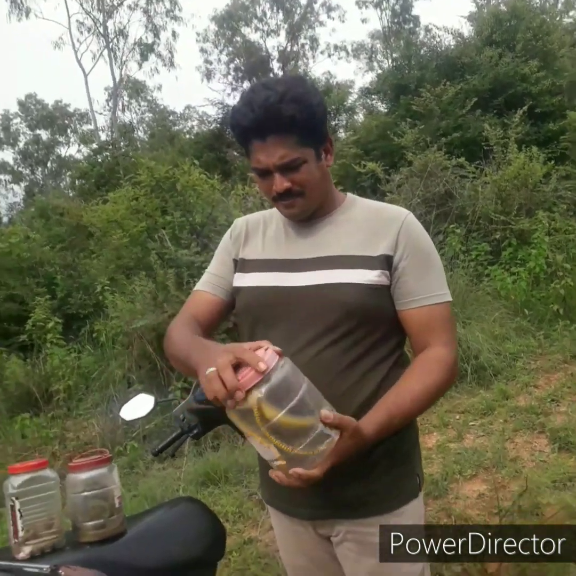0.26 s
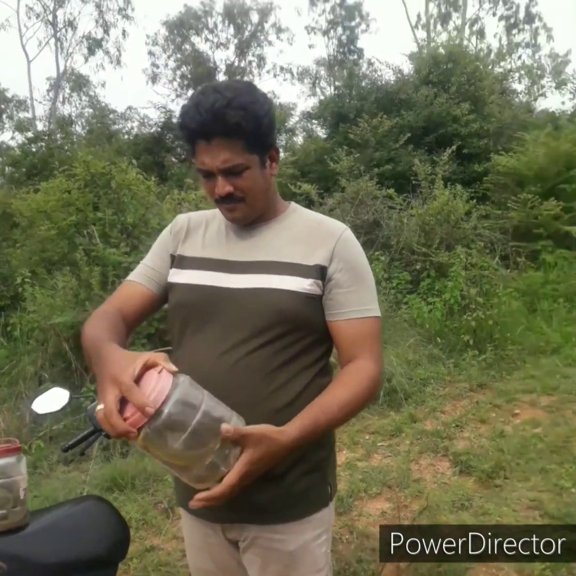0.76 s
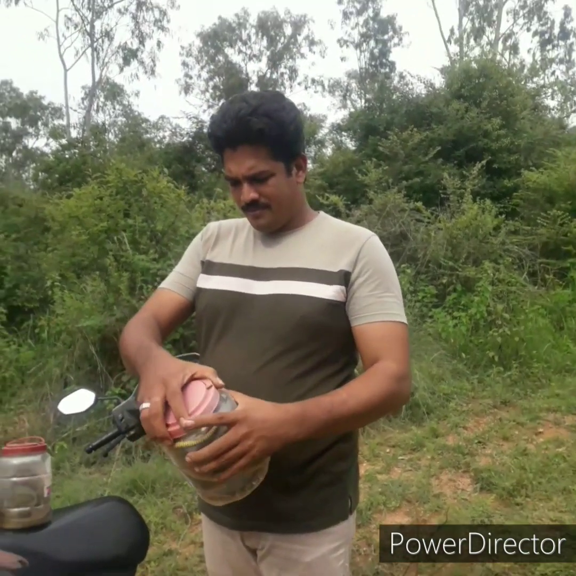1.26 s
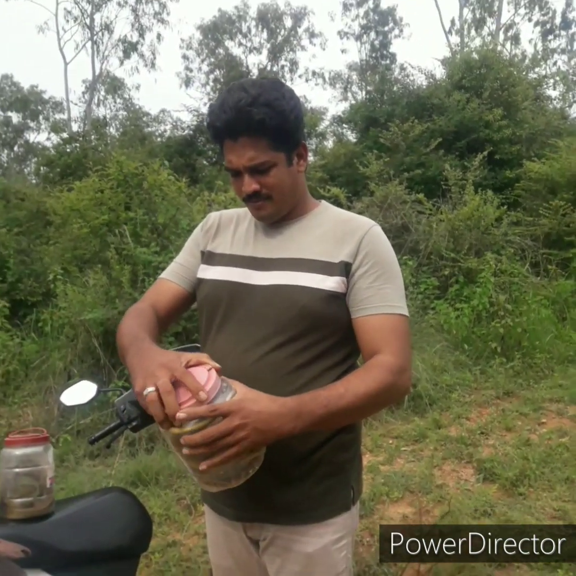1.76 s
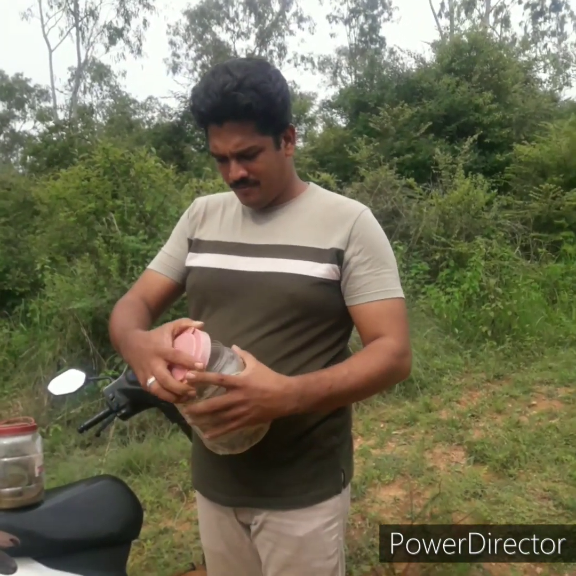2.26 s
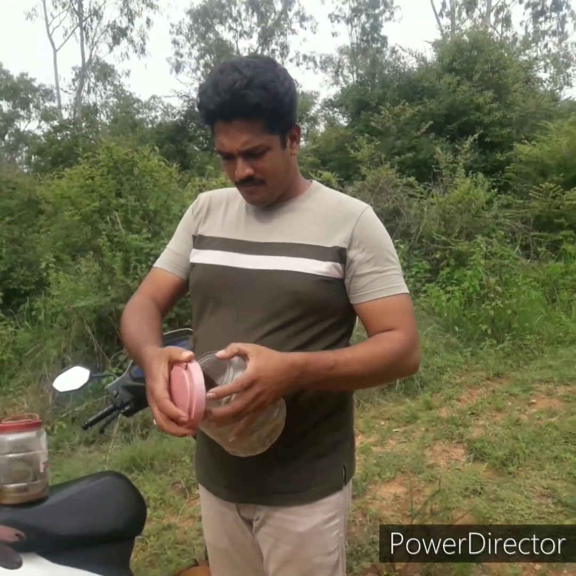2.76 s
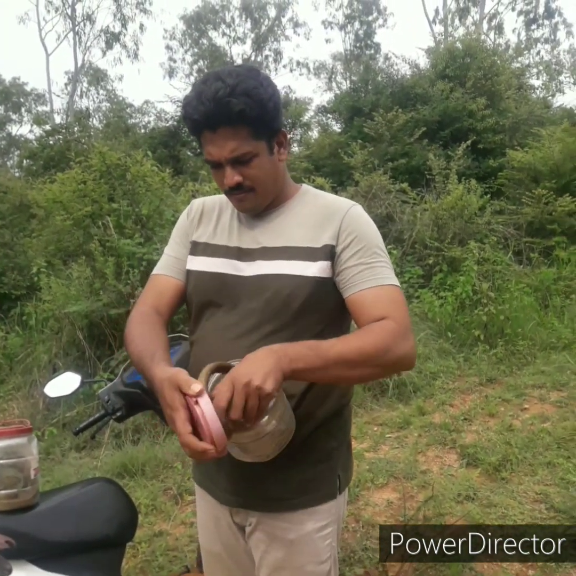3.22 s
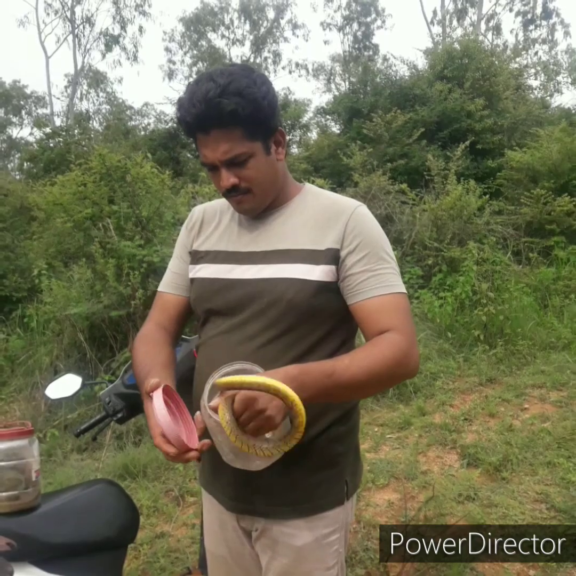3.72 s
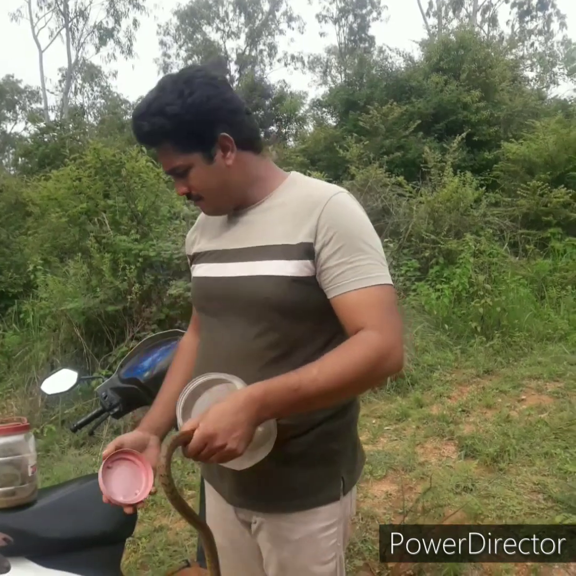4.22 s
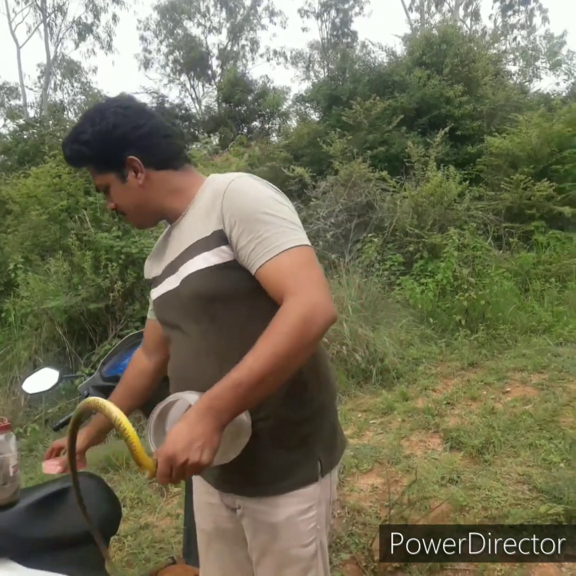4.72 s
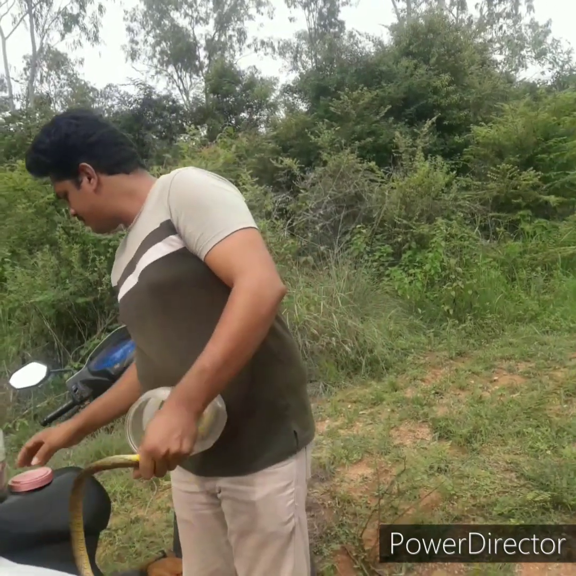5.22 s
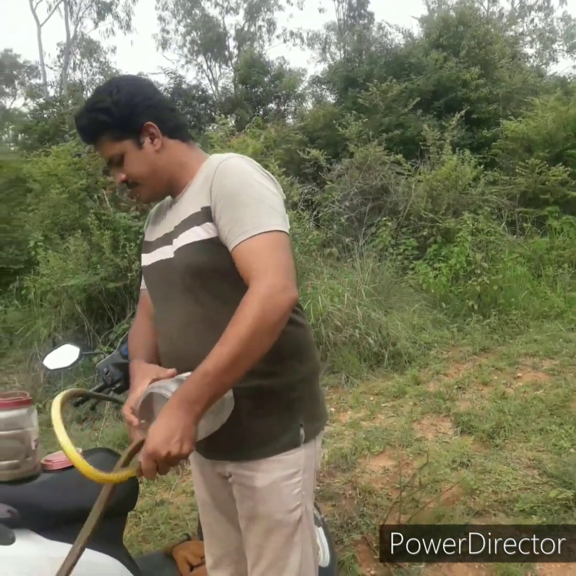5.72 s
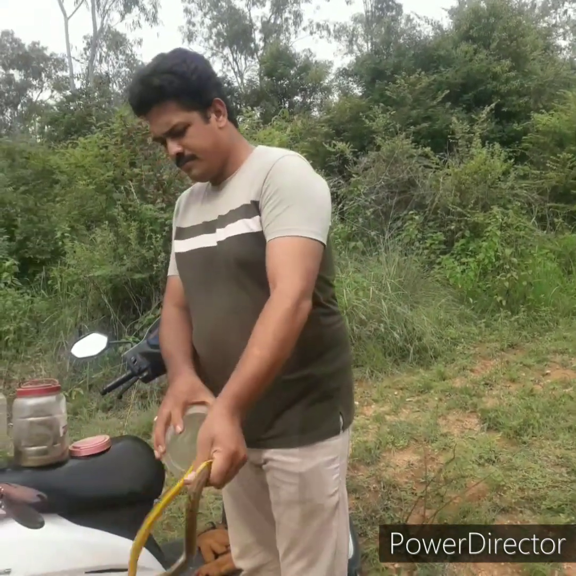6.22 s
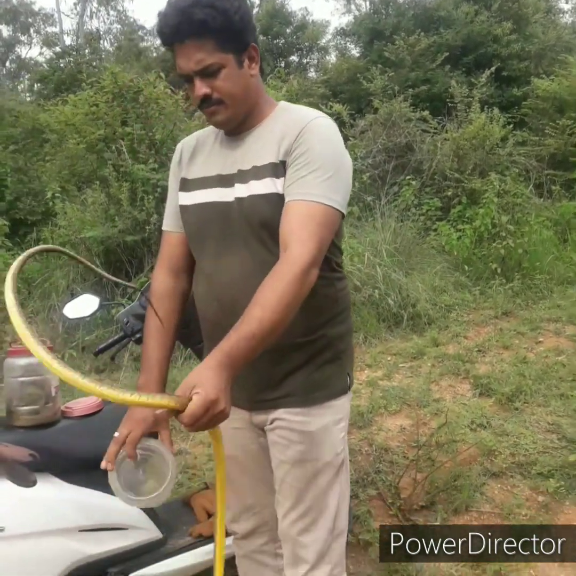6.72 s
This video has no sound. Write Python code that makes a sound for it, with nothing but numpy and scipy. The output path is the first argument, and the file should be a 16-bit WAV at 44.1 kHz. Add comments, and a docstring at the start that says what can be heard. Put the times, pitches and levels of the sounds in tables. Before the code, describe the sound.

A large thin plastic jar snaps and clicks as its screw lid is worked off, then gives hollow knocks over soft outdoor air and leaf rustle.

```python
"""A plastic jar handled outdoors

A big thin-walled jar is handled and its screw lid worked off: walls snap, thread ticks and rubs, and
the open jar knocks hollowly. Contacts are impulses exciting damped modes; rubs and hand moves are
trains of random small impulses. Behind them, filtered noise gives a soft rush of air and leaves, a
rustle and a fine high hiss, and noise-modulated sines give a few thin, blurred, gliding whistles."""
import sys
import numpy as np
from scipy import signal
from scipy.fft import rfft, irfft, next_fast_len
from scipy.io import wavfile

SR = 44100
rng = np.random.default_rng(int(sys.argv[2]) if len(sys.argv) > 2 else 0)


def persist_wave(psi):
    """Save psi, clipped to +-1, as 16-bit WAV."""
    counts = np.round(np.clip(psi, -1, 1) * 32767).astype(np.int16)
    wavfile.write(sys.argv[1], SR, np.atleast_2d(counts).T)


N = 307590   # samples

# snaps and knocks of jar and lid; level_db is that of the clack register, before peak rounding:
# start_s, level_db, boom_db and sizzle_db (both against the clack), ring_factor, crack_sharpness, panel_hz
JAR_CONTACTS = [ (.272, -25.5, -16, -2, 0.54, 1.05, 1170), (0.3363, -17.5, -11, -20.5, 0.89, .5, 488),
                (.388, -19, -21, -13, 0.47, 1.16, 1230), (1.367, -39.5, -4, -39, 0.54, .3, 670),
                (1.401, -20.5, -11, -13.5, 0.71, 0.31, 655), (1.4224, -26.5, -15, -20, .68, .26, 660),
                (1.673, -42, -2, -35, .64, .3, 681), (1.743, -21, -14.5, -31, 0.78, 0.63, 624),
                (1.7631, -41.5, 0, -36, 0.49, .4, 622), (1.933, -45.5, 8, -5, 0.87, .15, 231),
                (1.9582, -24.5, -19, -7, .29, 1.7, 1420), (1.9633, -24, -28.5, -6, 1.8, 1.8, 1170),
                (2.154, -52.5, 2, -11, 2.85, .3, 196), (2.167, -48.5, -1.5, -13, 2.6, .1, 990),
                (2.272, -56.5, -2, -37, .7, 0.61, 1741), (2.424, -49, -2, -25, 0.72, 0.33, 1241),
                (2.4339, -27, -18.5, -29.5, 0.59, 0.41, 638), (2.918, -42, -15, -35, 0.62, 0.38, 1280),
                (3.262, -53.5, 3, -3, 3.5, .18, 624), (3.293, -50, -11, -7, 1.3, 0.19, 182),
                (3.448, -46.5, -3.5, -6, 1.2, .1, 322), (3.935, -30.5, -24, -9, 0.71, .11, 676),
                (3.963, -29, -23, -24, 1.5, 0.35, 3020), (3.9734, -30.5, -12, -16, 1.24, .35, 2570),
                (3.9948, -14.5, -18, -19, 0.75, 0.12, 682), (4.009, -48, 23, -12.5, 0.9, .1, 383),
                (4.025, -35.5, -3, -21, 0.61, .34, 182), (4.238, -46.5, 5, -10, 1.2, .2, 534),
                (4.804, -50, -18, -12, .97, 0.31, 412), (4.995, -48.5, -11, -7, 0.8, .2, 307),
                (5.079, -52.5, 0, -10, .94, .3, 610), (5.15, -46.5, 5, -8, 0.85, 0.19, 289),
                (5.161, -38, -8.5, -8, 0.89, 0.32, 890), (5.223, -40.5, -12, -34, 0.98, 0.39, 661),
                (5.406, -55, 21, 3, 2.16, .2, 318), (5.688, -44, 7.5, -2, 6.6, .21, 282),
                (5.729, -52.5, 15.5, -3, 2.2, .22, 272), (5.77, -44.5, -11, 6.5, .9, 0.16, 303),
                (5.97, -47, 14.5, -14, 0.97, 0.26, 508), (6.034, -12.5, -7.5, -30.5, 1.3, 0.3, 304),
                (6.091, -57, 11, -12, 1.02, 0.18, 630), (6.577, -66, 33, 8, 1.9, .15, 273),
                (6.588, -58, 19.5, 7.5, 4.1, .2, 296), (6.9218, -13.5, -9, -18.5, 2.75, 0.41, 315)]
# the jar's registers boom, knock, clack, snap and sizzle: low_hz, high_hz
JAR_REGISTERS = [(115, 450), (450, 2200), (2200, 4500), (4500, 7300), (8000, 15500)]
# the jar's clear modes; mean strength, and decay at ring factor 1: mode_hz, strength_db, t60_s
CLEAR_MODES = [(159, -9, 0.067), (186, -3, 0.11), (254.5, -3.5, 0.084), (313.2, 1.5, 0.11),
               (392, -1.5, 0.071), (520, -1.5, 0.062), (605.13, -1, 0.082), (671.3, 2.5, 0.07505),
               (845, -4.5, 0.06841), (967.12, -0.5, 0.043), (1275, 0, 0.05281), (1530, -3.5, 0.045),
               (1950, -0.5, 0.051), (2142, -5, 0.042), (2472, 1, 0.034), (2745, 2.5, 0.048), (3305, 5, .03),
               (3600, 4, .035), (4310, 0, 0.042), (5180, 0, .04), (5910, 4, 0.051), (6430, 7.5, 0.038)]
# decay of the dense wall modes at ring factor 1: frequency_hz, t60_s
WALL_DECAY = [(200, 0.0001), (600, 0.1), (1500, 0.0471), (3500, 0.0072), (6000, 0.0434), (12000, 0.04)]
# spectrum of the dense wall modes: frequency_hz, relative_density_db (per Hz)
WALL_SPECTRUM = [(130, -11.5), (230, 1.5), (380, -0.5), (650, 0.5), (1000, -1), (1700, 1.5), (2500, 0),
                 (3300, 8), (4500, -2.5), (6200, 4), (7500, -13), (8700, -20), (11000, -4), (15000, -11.5)]
# hands and thread rubbing on the plastic: start_s, length_s, level_db, centre_hz
RUB_STROKES = [(1.151, 0.085, -51.5, 4600), (1.575, 0.053, -55.5, 2600), (1.972, 0.11, -52, 5030),
               (2.156, 0.045, -52, 3520), (2.63, 0.18, -61.5, 3500), (2.846, 0.15266, -56.5, 3020),
               (3.076, 0.072, -53.5, 4000), (3.206, 0.052, -57, 4020), (3.674, 0.05777, -54.5, 3920),
               (3.827, 0.092, -52, 5000), (5.106, 0.084, -57, 2500), (5.676, 0.069, -44.5, 4000),
               (5.778, 0.11, -47.5, 3050)]
# moves of the hand inside the jar, before the common trim: start_s, length_s, peak_level_db
HAND_MOVES = [(3.07, .4, -48), (3.58, 0.42, -47), (5.02, 0.26, -47), (5.62, 0.36, -44.5), (5.92, 0.22, -47)]
# thin whistles, before the common trim; bend above 1 glides early and settles, below 1 glides late:
# start_s, length_s, start_hz, end_hz, bend, level_db
THIN_WHISTLES = [ (0.399, 0.062, 4080, 3950, 1.2, -47), (0.509, 0.33, 3480, 3160, 1.4, -53.5),
                 (.93, .19, 6770, 5660, 3.4, -48), (1.161, 0.094, 3500, 3150, 1.5, -56),
                 (1.227, .1, 3500, 2500, 0.36, -51), (2.283, 0.056, 2200, 3200, .55, -68),
                 (3.67, 0.053, 3890, 3860, 1.1, -50.5), (4.397, 0.088, 6000, 6020, 1.3, -55),
                 (4.551, 0.148, 4700, 4540, 1.07, -62), (4.703, 0.18, 3540, 3390, 0.94, -61),
                 (5.167, 0.115, 3170, 2970, .9, -57), (5.347, 0.16, 7020, 6020, 1.5, -50),
                 (5.535, 0.11, 4220, 4020, 1.1, -50.5), (5.79, .18, 3540, 2640, 1.5, -52.5),
                 (6.168, 0.23, 2370, 2460, 2.5, -66)]
# level curve of the soft rustle, before RUSTLE_DB: time_s, level_db
RUSTLE_LEVEL = [(0.0, -57.5), (0.21, -56), (0.81, -60.5), (0.96, -63.5), (1.11, -68.5), (1.84, -59.5),
                (2.25, -71.5), (2.48, -74), (3.9, -62.5), (4.48, -74.5), (4.69, -69), (5.17, -65.5),
                (5.71, -67.5), (5.88, -61.5), (6.03, -59.5), (6.38, -69), (6.61, -86), (6.9, -57.5)]
# spectrum of the soft rustle: frequency_hz, relative_density_db (per Hz)
RUSTLE_SPECTRUM = [(100, -16.5), (500, 3), (900, -0.5), (1800, -2), (2700, -1.5), (3300, 1.5), (4700, 1),
                   (6100, 3), (7000, -2), (7800, -14), (15500, -12)]
# common level curve of air and hiss, before each layer's offset: time_s, level_db
BACKGROUND_LEVEL = [(0.0, -61), (0.33, -58), (0.55, -62), (1.15, -62.5), (1.9, -58), (2.17, -64.5),
                    (2.48, -69.5), (2.77, -69), (3.17, -64.5), (3.46, -57.5), (3.9, -55), (4.82, -58.5),
                    (5.78, -53.5), (6.67, -56.5), (6.9, -56)]
# spectrum of the moving air: frequency_hz, relative_density_db (per Hz)
AIR_SPECTRUM = [(25, -7), (100, -4), (205, 1), (350, -7.5), (500, -9), (660, -7.5), (1100, -14),
                (1800, -20), (2700, -15.5), (3300, -15.5), (4700, -18), (6100, -9.5), (7000, -13.5),
                (7600, -29.5)]
# spectrum of the high hiss: frequency_hz, relative_density_db (per Hz)
HISS_SPECTRUM = [(7500, -6.5), (9000, -8.5), (10000, -0.5), (10900, 2), (11700, -3.5), (12600, -13),
                 (14000, -12), (15500, -13.5)]
# passbands of low air, high air and hiss: low_hz, high_hz
BACKGROUND_BANDS = [(34, 1100), (2800, 7500), (7700, 16000)]

KNOCK_DB, KNOCK_FOLLOWS_BOOM = 1.5, 0.37   # the knock register rises with the boom
SNAP_DB, SNAP_FOLLOWS_SIZZLE = 5, 0.45   # the snap register rises with the sizzle
GROUND_ECHO_S, GROUND_ECHO_DB = .005, -9
LOW_AIR_DB, HIGH_AIR_DB, HISS_DB = 2.5, -4.5, 0.5   # against the background curve
RUSTLE_DB = 7   # against the rustle curve
CUTOFF_HZ = 15900


def contacts(modes_db=-5, panel_db=-11, crack_db=0, give_s=0.0024, give_fall=9.6):
    """Buckling: an impulsive crack excites the shell's modes, and the ground reflects the sound."""
    out, t = np.zeros(N), np.arange(5120) / SR
    filters = [signal.butter(4 if low > 1000 else 3, [low, high], "band", fs=SR, output="sos")
               for low, high in JAR_REGISTERS]
    for start, level_db, boom_db, sizzle_db, ring, sharpness, panel_hz in JAR_CONTACTS:
        rise_s = give_s * np.exp(-give_fall * sharpness)   # a blunt contact gives way gradually
        shell = wall_ring(t, ring) + from_db(modes_db) * jar_ring(t, ring)
        blow = energy_one(shell * (1 - np.exp(-t / rise_s)))
        blow[0] += sharpness * from_db(crack_db)
        # the jar is never at quite the same height
        lag_s = GROUND_ECHO_S * (1 + .06 * rng.standard_normal())
        blow = blow + from_db(GROUND_ECHO_DB) * np.interp(t - lag_s, t, blow, left=0)
        blow = blow + from_db(panel_db) * panel_ring(t, panel_hz, ring)
        knock_db = KNOCK_DB + KNOCK_FOLLOWS_BOOM * boom_db
        snap_db = SNAP_DB + SNAP_FOLLOWS_SIZZLE * sizzle_db
        voiced = 0
        for register_db, sos in zip([boom_db, knock_db, 0, snap_db, sizzle_db], filters):
            register = energy_one(signal.sosfilt(sos, blow))
            voiced = voiced + from_db(level_db + register_db) * register
        add(out, start, voiced * np.sqrt(SR / 100))   # levels count over a hundredth of a second
    return out


def wall_ring(t, ring, spread_cycles=0.61):
    """Dense bending modes: low waves build up late, and each half octave decays at its own rate."""
    edges = 110 * 2 ** (np.arange(16) / 2)
    hz = np.fft.rfftfreq(len(t), 1 / SR)
    spectrum = rfft(rng.standard_normal(len(t))) * from_db(at_hz(WALL_SPECTRUM, hz))
    out = 0
    for low, high in zip(edges, edges[1:]):
        centre = np.sqrt(low * high)
        build_up = 1 - np.exp(-t * centre / spread_cycles)
        decay = from_db(-60 * t / (ring * at_hz(WALL_DECAY, centre)))
        out = out + build_up * decay * irfft(spectrum * (hz >= low) * (hz < high), len(t))
    return energy_one(out)


def jar_ring(t, ring, swell_cycles=1.3, scatter_db=3.5):
    """Modal superposition: damped sines of random strength and sign, swelling over about a cycle."""
    hz, db, t60 = np.transpose(CLEAR_MODES)[:, :, None]
    strength = from_db(db + scatter_db * rng.standard_normal(hz.shape))
    strength = strength * rng.choice([-1, 1], hz.shape)
    decay = from_db(-60 * t / (t60 * np.sqrt(ring)))
    swell = 1 - np.exp(-t * hz / swell_cycles)
    return energy_one(np.sum(strength * decay * swell * np.sin(2 * np.pi * hz * t), axis=0))


def panel_ring(t, hz, ring, t60=0.044):
    """Local resonance: the patch of wall that gives way rings as one damped sine."""
    decay = from_db(-60 * t / (t60 * ring))
    return energy_one(np.sin(2 * np.pi * hz * t) * (1 - np.exp(-t * hz)) * decay)


def rubs(slips_per_s=5000, grain_db=3.0, top_hz=6700):
    """Friction as random tiny slips of skin and thread, swelling and fading with the stroke."""
    out = np.zeros(N)
    for start, length, level_db, hz in RUB_STROKES:
        u = stroke(length)
        slips = random_impulses(slips_per_s, from_db(grain_db * rng.standard_normal(len(u))))
        scrape = band(band(slips, hz / 2, hz * 2, order=1), 300, top_hz, order=5)
        scrape = energy_one(scrape * np.sin(np.pi * u))
        add(out, start, from_db(level_db) * np.sqrt(length * SR) * scrape)
    return out


def fumble(bumps_per_s=420, size_db=3.5, low_hz=360, high_hz=860, level_db=-3.5):
    """Modal response to random impulses: a hand moving inside the jar bumps its low modes softly."""
    t = np.arange(N) / SR
    effort = 0
    for start, length, peak_db in HAND_MOVES:
        progress = np.clip((t - start) / length, 0, 1)
        effort = effort + from_db(peak_db) * np.sin(np.pi * progress)
    bumps = random_impulses(bumps_per_s, from_db(size_db * rng.standard_normal(N).clip(-2, 2)))
    ring_t = t[:4096]
    response = jar_ring(ring_t, 0.55) + wall_ring(ring_t, 0.55)
    hollow = band(signal.fftconvolve(bumps, response)[:N], low_hz, high_hz, order=2)
    return from_db(level_db) * effort * rms_one(hollow)


def thicket(x, t60=0.26, wet_db=-28, top_hz=6800):
    """Diffuse scattering: bushes return a faint tail, modelled as decaying band-limited noise."""
    t = np.arange(SR // 2) / SR
    tail = band(rng.standard_normal(len(t)), 170, top_hz)
    tail = tail * from_db(-60 * t / t60) * (1 - np.exp(-t / 0.005))
    return from_db(wet_db) * signal.fftconvolve(x, energy_one(tail))[:N]


def whistles(waver=0.0045, blur_per_khz=.15, blur_cycles=9, fading_db=2.0, level_db=-2):
    """Frequency glides with random fading: thin tones are blurred by noise, high ones most."""
    out = np.zeros(N)
    for start, length, start_hz, end_hz, bend, db in THIN_WHISTLES:
        u = stroke(length)
        glide_hz = end_hz + (start_hz - end_hz) * (1 - u) ** bend
        hz = glide_hz * (1 + waver * drift(197, len(u)))
        blur_rate = end_hz / blur_cycles
        blur_noise = drift(blur_rate, len(u)) + 1j * drift(blur_rate, len(u))
        blur = 1 + blur_per_khz * end_hz / 1000 * blur_noise
        tone = np.real(blur * np.exp(2j * np.pi * np.cumsum(hz) / SR))
        swell = np.sqrt(u * (1 - u)) * from_db(fading_db * drift(47.5, len(u)))
        add(out, start, from_db(db + level_db) * np.sqrt(length * SR) * energy_one(swell * tone))
    return out


def rustle(flicker_db=1.3, flickers_per_s=28):
    """Modulated noise: a soft rustle of leaves and clothing comes and goes."""
    level_db = RUSTLE_DB + in_time(RUSTLE_LEVEL) + flicker_db * drift(flickers_per_s, N)
    return from_db(level_db) * rms_one(coloured(RUSTLE_SPECTRUM))


def outdoors(air_flicker_db=2.0, hiss_flicker_db=.5, flickers_per_s=30):
    """Co-modulated noise bands: air and hiss swell and sink together, each flickering a little."""
    air, hiss = coloured(AIR_SPECTRUM), coloured(HISS_SPECTRUM)
    layers = [(air, LOW_AIR_DB, air_flicker_db),
              (air, HIGH_AIR_DB, air_flicker_db),
              (hiss, HISS_DB, hiss_flicker_db)]
    steady = 0
    for (source, db, flicker_db), (low, high) in zip(layers, BACKGROUND_BANDS):
        gain = from_db(db + flicker_db * drift(flickers_per_s, N))
        steady = steady + gain * rms_one(band(source, low, high, order=5))
    return from_db(in_time(BACKGROUND_LEVEL)) * steady


def random_impulses(rate, size):
    """Poisson-like excitation: sparse Gaussian impulses, rate a second on average, scaled by size."""
    return (rng.random(len(size)) < rate / SR) * rng.standard_normal(len(size)) * size


def coloured(spectrum):
    """Spectral shaping: white noise weighted to the given spectrum."""
    size = next_fast_len(N, True)
    gain = from_db(at_hz(spectrum, np.fft.rfftfreq(size, 1 / SR)))
    return irfft(rfft(rng.standard_normal(size)) * gain, size)[:N]


def drift(rate, size, count=512):
    """Slow random modulation: straight lines between unit Gaussian values, rate of them a second."""
    return np.interp(np.arange(size) * rate / SR, np.arange(count), rng.standard_normal(count))


def stroke(length, size=12288):
    """Normalised time: from 0 to 1 over length seconds, then held; cut off after size samples."""
    return np.minimum(np.arange(size) / (length * SR), 1)


def band(x, low, high, order=3):
    """Causal Butterworth band-pass filtering."""
    return signal.sosfilt(signal.butter(order, [low, high], "band", fs=SR, output="sos"), x + 1e-18)


def from_db(db):
    """Logarithmic level: decibels to amplitude gain."""
    return 10 ** (np.asarray(db) / 20)


def rms_one(x):
    """Power normalisation: scale to rms 1."""
    return x / np.sqrt(np.mean(x ** 2) + 1e-20)


def energy_one(x):
    """Energy normalisation: scale the sum of squares to 1."""
    return x / np.sqrt(np.sum(x ** 2) + 1e-20)


def at_hz(points, hz):
    """Interpolation of a table on a log-frequency axis."""
    f, value = np.transpose(points)
    return np.interp(np.log(np.maximum(hz, 1)), np.log(f), value)


def in_time(rows):
    """Linear interpolation of a time curve at every sample."""
    return np.interp(np.arange(N) / SR, *np.transpose(rows))


def add(out, start, sound):
    """Superposition: mix a sound in at start seconds."""
    at = max(0, round(start * SR))
    out[at:at + len(sound)] += sound[:max(0, N - at)]


def scene():
    """Superposition: jar in front, surroundings behind, the same signal in both channels."""
    jar = contacts() + rubs() + fumble()
    mono = jar + thicket(jar) + whistles() + rustle() + outdoors()
    return np.array([mono, mono])


def record(dry):
    """Saturation and band limiting: high peaks are rounded and the top is cut."""
    rounded = 1.2 * np.tanh(dry / 1.2)
    return signal.sosfilt(signal.ellip(10, .2, 70, CUTOFF_HZ, fs=SR, output="sos"), rounded)


dry = scene()
out = record(dry)
persist_wave(out)
```